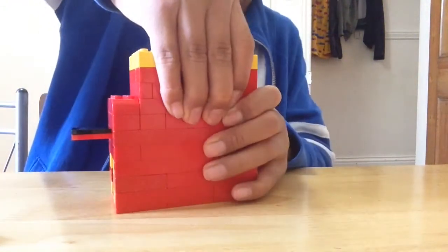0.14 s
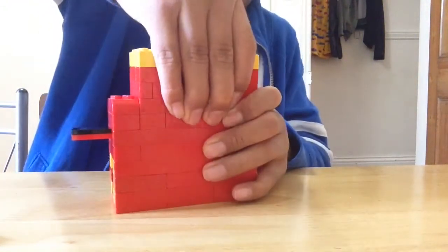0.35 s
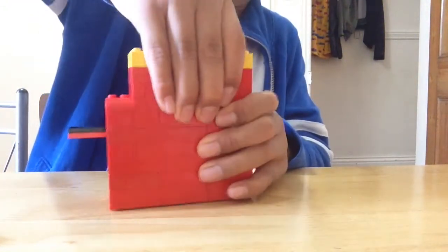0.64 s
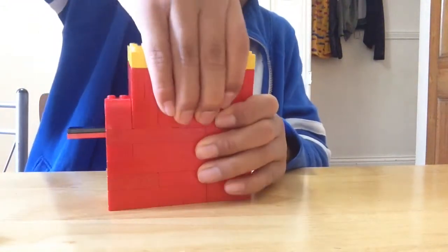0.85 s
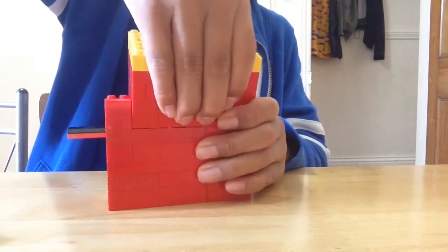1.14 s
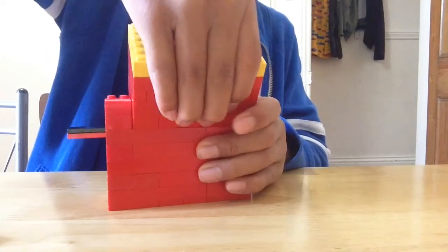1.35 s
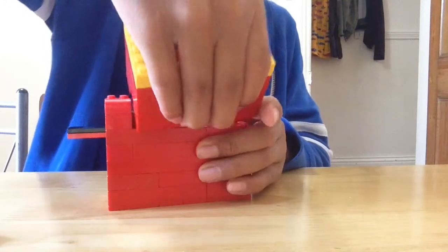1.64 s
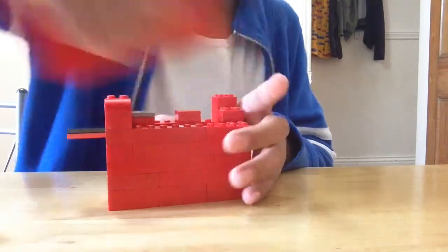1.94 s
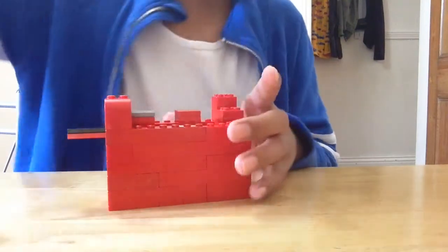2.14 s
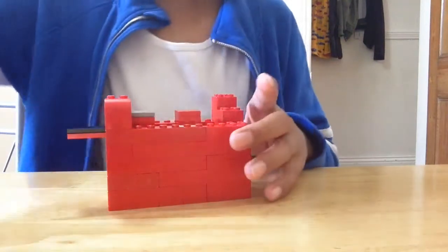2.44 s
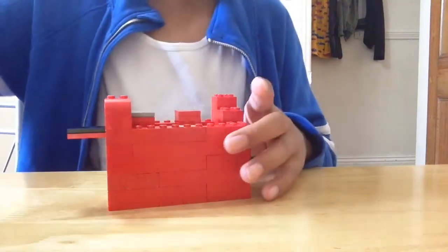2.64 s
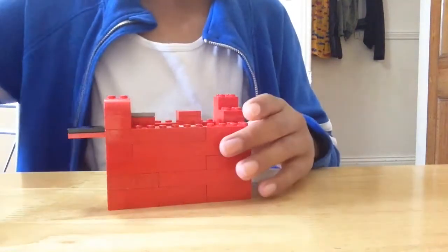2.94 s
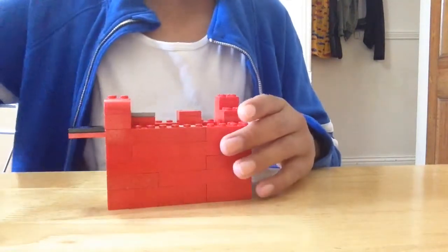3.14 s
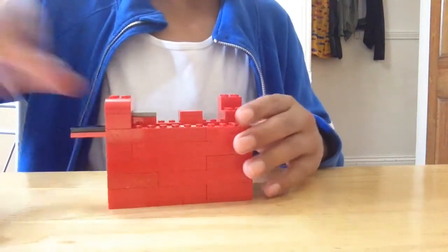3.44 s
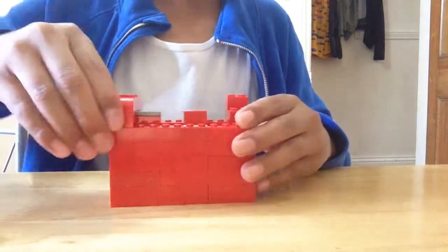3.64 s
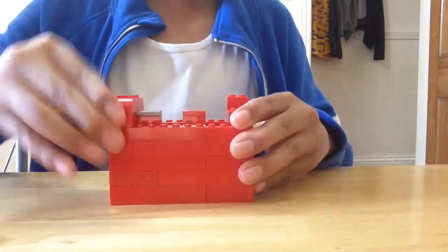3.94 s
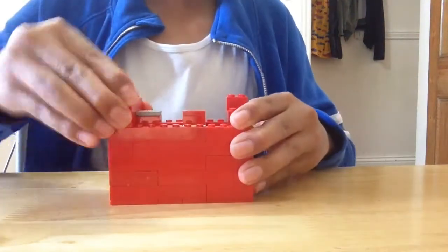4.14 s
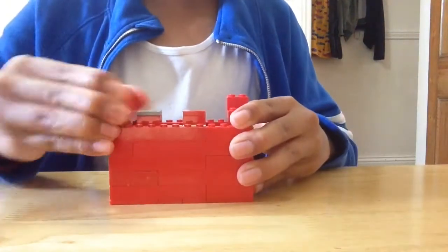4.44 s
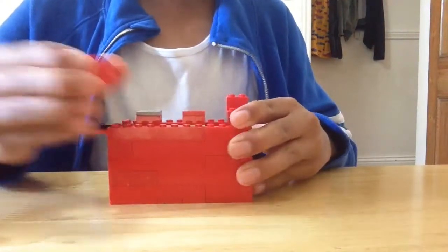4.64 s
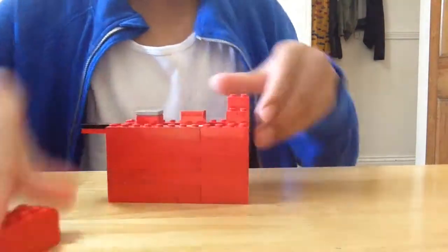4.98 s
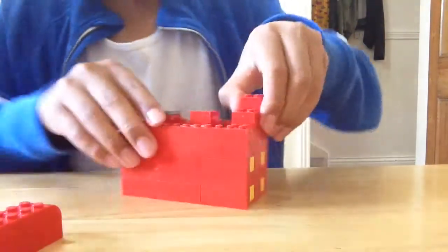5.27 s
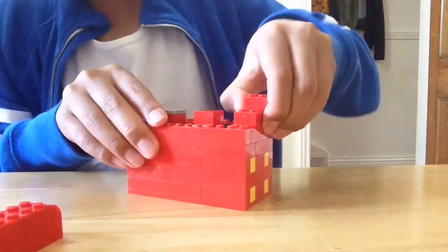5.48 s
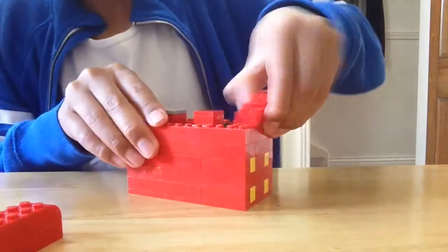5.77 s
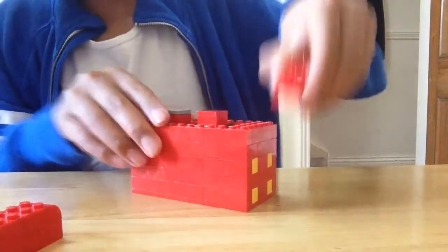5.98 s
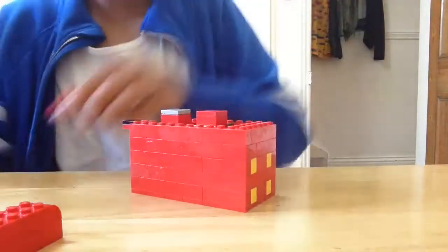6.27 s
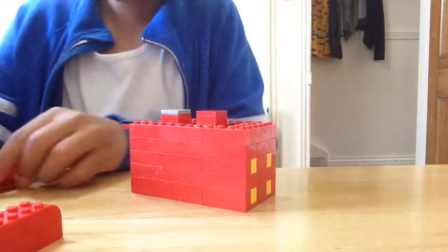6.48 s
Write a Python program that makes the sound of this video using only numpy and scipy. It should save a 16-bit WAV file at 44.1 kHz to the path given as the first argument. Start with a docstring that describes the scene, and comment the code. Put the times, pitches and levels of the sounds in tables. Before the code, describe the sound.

Hands pull plastic building bricks apart: dry clicks, short scrapes, a loose rattle, then two sharp cracks and last clicks over faint hiss.

```python
"""Hollow plastic toy bricks on a wooden table, close to a small microphone, for about six and a half seconds.
From the start there is hiss and the brush of hands; bricks click (chatter rings their thin walls), contacts thump
the table top, slipping bricks scrape and, from about 1 s, knocked or rubbed walls ring on in narrow bands of noise.
A small furnished room echoes it all. From 1.5 to 2.7 s it is sparse, then busy again; loose bricks rattle between
3.2 and 3.8 s. The loudest cracks come near 4.9 and 5.8 s, and a few last clicks near 6.5 s."""
import sys
import numpy as np
from scipy import signal
from scipy.fft import rfft, irfft, next_fast_len
from scipy.io import wavfile

SR = 44100
rng = np.random.default_rng(int(sys.argv[2]) if len(sys.argv) > 2 else 0)


def digitize_waveform(pressure):
    """Quantize a signal to 16-bit integers and store it at the path in sys.argv[1].

    Rows of a 2-D input are taken as channels; values are limited to [-1, 1].
    """
    field = np.atleast_2d(pressure).T
    bounded = np.clip(field, -1, 1)
    quanta = np.round(bounded * 32767).astype(np.int16)
    wavfile.write(sys.argv[1], SR, quanta)


def volts(x):
    """Linear amplitude factor 10**(x/20) for a level x in dB, scalar or array-like."""
    e = np.asarray(x, float) / 20
    return 10 ** e


N = 291492  # length in samples
T = np.arange(N) / SR  # time in seconds
HELD = .55  # share of the free ring time left while surfaces stay pressed together


def level(x, db):
    """Scale to an rms level in dB."""
    return x * volts(db) / np.sqrt(np.mean(x ** 2))


def band(x, lo_hz, hi_hz):
    """Keep the sound between two frequencies."""
    sos = signal.butter(2, [lo_hz, min(hi_hz, .45 * SR)], "band", fs=SR, output="sos")
    return signal.sosfilt(sos, x)


def fade_60db(t, t60):
    """A steady decay that has lost 60 dB after t60 seconds."""
    return np.exp(-np.log(1000) * t / t60)


def ring(hz, db, t60, size, sign=1):
    """One blow sets off several modes (natural tones of an object), and each dies away at its own speed."""
    t = np.arange(size)[:, None] / SR
    tones = np.sin(2 * np.pi * hz * t) * fade_60db(t, np.maximum(t60, .002))
    return (sign * volts(db) * tones).sum(axis=1)


def add(out, s, x, peak_db):
    """Lay a short sound in at time s with the given peak."""
    i = max(int(s * SR), 0)
    out[i:i + len(x)] += (x * volts(peak_db) / np.abs(x).max())[:N - i]


def grit(size, spread_db):
    """Dense tiny impacts: a few are much larger than the rest."""
    return rng.standard_normal(size) * volts(spread_db * rng.exponential(size=size))


# The tones of one brick's walls.
# Each row: frequency in Hz, level in dB, free ring time in seconds (to fall 60 dB).
BRICK_MODES = [(776, 6, 0.0077), (950, 0.5, 0.021), (1393, 5.5, 0.0089), (1503, 7, 0.008),
               (2200, 2, 0.0048), (2430, -1.5, 0.0061), (2770, 8, 0.0019), (3420, 6.5, 0.0044),
               (4027, 9, 0.0015), (4350, 7.5, 0.0027), (5460, -3, 0.0088), (5570, -1, 0.0053),
               (6380, 1.5, 0.0055), (7470, 3.5, 0.0017), (9500, 4, 0.0017), (11000, 4, 0.0017),
               (12580, -3, 0.0047), (14800, -2.5, 0.0041)]


def brick(force, ring_hz, below_db, above_db, free=1):
    """A force rings the walls; the grip shifts the modes a little and lets one region speak while it damps the rest."""
    hz, db, t60 = np.transpose(BRICK_MODES)
    grip_hz, grip_db = rng.standard_normal((2, len(hz)))
    # neighbouring modes move the air in opposite phase
    sign = (-1.) ** np.arange(len(hz))
    walls = ring(hz * (1 + 0.058 * grip_hz), db + 2 * grip_db, free * t60, size=1024, sign=sign)
    walls[0] = 2.67  # the bare crack of contact fills the gaps between the modes

    size = next_fast_len(len(force) + 1024, True)
    f = np.fft.rfftfreq(size, 1 / SR) + 1
    # both tilts are 0 at ring_hz; below grows toward the bass, above reaches 1 at 10 kHz
    below = np.clip(np.log(ring_hz / f) / max(np.log(ring_hz / 450), .4), 0, 1.5) ** 0.79
    most_above = 1.5 if above_db < 0 else 1
    above = np.clip(np.log(f / ring_hz) / np.log(10000 / ring_hz), 0, most_above) ** 0.98
    tilt = volts(below_db * below + above_db * above)
    sound = irfft(rfft(force, size) * rfft(walls, size) * tilt, size)
    return np.roll(sound, shift=44)  # 1 ms later


def bass(s, ring_hz, contact_db):
    """The smaller the wall that rings, the less bass under it: tilt in dB toward the bass."""
    # loose bricks stirred off to the side do not drive the table
    away_db = -12.5 * (3.3 < s < 3.76)
    return contact_db - 3 * np.log2(ring_hz / 450) + away_db  # 3 dB less per octave


def rub(envelope, spread_db, ring_hz, below_db, above_db, count):
    """Several bricks rub at once, each gripped its own way."""
    total = 0
    for _ in range(count):
        force = grit(len(envelope), spread_db) * envelope
        total = total + brick(force, ring_hz, below_db, above_db, free=HELD)
    return total


# The tones of the wooden table top.
# Each row: frequency in Hz, level in dB, ring time in seconds (to fall 60 dB).
TABLE_MODES = [(116, -9.5, 0.069), (194, -16, 0.079), (251, 0.5, 0.034), (304.7, 4, 0.057),
               (372.3, 0.5, 0.073), (454.4, 3, 0.043), (562, -6.5, 0.063), (667, -7, 0.046),
               (810, -23, 0.028)]


def table_top(hz_shift=0, db_shift=0):
    """One blow rings the wooden top; the shifts move each tone by a share of its frequency and by dB."""
    hz, db, t60 = np.transpose(TABLE_MODES)
    return ring(hz * (1 + hz_shift), db + db_shift, t60, size=6000)


# The colour of the hiss, from bass to treble.
# Each row: frequency in Hz, relative level in dB (the loudness is set in hiss()).
HISS_COLOUR = [(82, -43), (140, 0), (192, -32), (375, 25.5), (1090, 1), (1490, -13.5), (7780, -23),
               (12700, -34), (14600, -10), (15500, 4.5)]


def hiss():
    """Steady room tone and microphone noise: random noise shaped by frequency."""
    f = np.fft.rfftfreq(N, 1 / SR) + 1
    hz, db = np.transpose(HISS_COLOUR)
    colour_db = np.interp(np.log(f), np.log(hz), db)
    noise = irfft(rfft(rng.standard_normal(N)) * volts(colour_db), N)
    return level(noise, -70.5)


# How busily the hands move over the bricks; the level glides from row to row.
# Each row: time in seconds, level of the rubbed walls in dB.
HAND_MOTION = [(0.0, -55), (0.2, -67), (0.45, -68), (0.98, -62.5), (1.31, -66), (1.6, -67), (2.74, -67.5),
               (2.87, -50), (3.04, -60), (3.28, -60.5), (3.61, -55.5), (3.9, -65.5), (4.25, -65),
               (5.01, -64.5), (5.36, -63.5), (5.67, -67), (6.35, -67), (6.55, -64)]


def slide():
    """Slow light handling: hands brush the bricks and rest on the table, so walls, fine grit and table all sound."""
    busy_db = np.interp(T, *np.transpose(HAND_MOTION))
    rubbed = rub(np.ones(N), 1.95, 1100, 2.5, 0, count=5)[:N]
    walls = level(band(rubbed, 580, 5800), 0)
    fine = level(band(grit(N, 1.3), 2040, 14000), -1.5)  # dB against the walls
    table = level(signal.fftconvolve(rng.standard_normal(N), table_top())[:N], 0)
    # -65 dB at average busyness; the rumble follows 0.87 of the hands' rise and fall in dB
    rumble_db = -65 + 0.87 * (busy_db - busy_db.mean())
    return volts(busy_db) * (walls + fine) + volts(rumble_db) * table


# How long the room echoes.
# Each row: frequency in Hz, time in seconds for the echo to fall 60 dB.
ROOM_DECAY = [(150, 0.45), (500, 0.3), (1500, 0.23), (5000, 0.33), (14000, 0.22)]


def room(x):
    """Diffuse echoes, octave by octave, that start after the first walls."""
    t = np.arange(SR // 2) / SR
    decay_hz, decay_s = np.transpose(ROOM_DECAY)
    tail = 0
    for hz in 125 * 2 ** np.arange(7.):
        t60 = np.interp(np.log(hz), np.log(decay_hz), decay_s)
        tail = tail + band(rng.standard_normal(len(t)), hz, 2 * hz) * fade_60db(t, t60)
    tail = tail * np.clip((t - .004) / 0.0073, 0, 1)  # silent for 4 ms, then builds up
    tail = tail / np.sqrt(np.sum(tail ** 2))
    return volts(-10) * signal.fftconvolve(x, tail)[:N]


# Bricks that click apart or together.
# Each row: time in seconds, peak level in dB, loudest ring in Hz, treble tilt above that ring in dB.
BRICK_CLICKS = [(0.0064, -26.5, 3720, -2), (0.0881, -14.5, 760, 7.5), (0.198, -32, 2500, 1),
                (0.2177, -18.5, 1770, -3), (0.2323, -21.5, 961, 11), (0.255, -18.5, 920, 7),
                (0.266, -20.5, 2130, 20), (0.298, -19.5, 2300, -32), (0.3193, -22, 1710, 9),
                (0.455, -41.5, 940, -47), (0.6896, -24.5, 720, -24), (0.7044, -29, 740, -27),
                (0.7938, -24.5, 1780, -1), (0.824, -32.5, 2990, -10), (0.9267, -26, 2040, 1),
                (0.9435, -24.5, 2320, -3), (1.047, -20.5, 2190, -0.5), (1.0522, -22.5, 2300, -32),
                (1.151, -42, 2340, -16), (1.1864, -42, 1370, -17), (1.298, -40, 1600, -23),
                (1.402, -31, 1430, -11), (1.9078, -34, 1590, -5), (2.2344, -47.5, 1170, -32),
                (2.347, -47.5, 1540, -14), (2.707, -32.5, 1360, 33), (2.7305, -29.5, 1350, -1),
                (2.7654, -13.5, 2200, -5.5), (2.7817, -17, 925, -22), (2.9135, -24.5, 880, -10),
                (2.9393, -22, 980, -49), (2.977, -34, 1330, -4), (2.9959, -26.5, 1330, -12),
                (3.0034, -26, 1030, 0), (3.028, -26, 950, -18), (3.223, -33, 3230, -13),
                (3.24, -25.5, 2900, -40), (3.2754, -22.5, 896, -7.5), (3.3343, -16, 2130, -1),
                (3.3517, -18, 900, -13), (3.3723, -22.5, 3160, -16), (3.3857, -22, 3250, -22),
                (3.4007, -22.5, 2360, -25), (3.4107, -24.5, 1210, -24), (3.464, -33.5, 930, -4),
                (3.4874, -33, 2800, -16), (3.5546, -18.5, 3420, 6), (3.7351, -33.5, 872, -13),
                (3.8104, -32, 2900, -32), (3.9818, -29, 600, -26), (4.128, -41.5, 654, 2),
                (4.155, -35, 840, -28), (4.1856, -30.5, 1720, -14.5), (4.2205, -29.5, 2000, -9),
                (4.294, -22, 2240, -6.5), (4.4389, -18.5, 1620, -5.5), (4.4514, -23, 820, -7),
                (4.4744, -43, 1660, 4), (4.564, -34.5, 1030, -23), (4.5794, -39, 1310, 29),
                (4.8851, -11.5, 1300, -5.5), (4.901, -5, 4330, -12.5), (4.9135, -25, 2730, -32),
                (4.979, -19, 2620, -17.5), (5.0036, -19, 5600, -28), (5.0133, -18, 2370, -13),
                (5.0292, -23, 1380, -15), (5.244, -41, 1590, -43), (5.515, -28, 3100, -5),
                (5.5407, -21, 2780, 3.5), (5.6034, -22, 625, 0), (5.7962, -17, 6850, 3),
                (5.8006, -6.5, 3330, -8.5), (5.8124, -18.5, 751, -27), (5.848, -25.5, 2700, -12),
                (6.002, -41.5, 1490, -33), (6.0214, -40.5, 800, -14), (6.3133, -34.5, 937, -31),
                (6.383, -34, 700, -12), (6.4677, -14.5, 4200, -13), (6.4784, -27, 4030, -29),
                (6.5176, -29, 1500, -20), (6.566, -37, 1600, -18)]


def clicks():
    """Studs let go or meet in a quick chatter that rings the brick walls."""
    out = np.zeros(N)
    ms = np.arange(1024) / SR * 1000
    usual_ms, scatter, snap_db = 3.2, 0.11, 11.5  # chatter fade time, its scatter, size of the snap
    for s, peak_db, ring_hz, above_db in BRICK_CLICKS:
        chatter_ms = usual_ms * np.exp(scatter * rng.standard_normal())
        swell = 1 - np.exp(-ms / 2.03)
        chatter = grit(1024, 1.41) * swell * np.exp(-ms / chatter_ms)
        chatter[SR // 1000] = volts(snap_db)  # the first stud to go stands out, 1 ms in
        below_db = bass(s, ring_hz, -5.5)
        add(out, s - .002, brick(chatter, ring_hz, below_db, above_db, free=HELD), peak_db)
    return out


# Contacts heavy enough to sound the table.
# Each row: time in seconds, peak level in dB.
TABLE_THUMPS = [(0.084, -28.5), (0.216, -29), (0.252, -27), (0.3, -29.5), (0.448, -46.5), (0.69, -20),
                (0.925, -42.5), (1.047, -25), (1.083, -40.5), (1.216, -40.5), (1.319, -36.5),
                (1.384, -38.5), (1.492, -43.5), (1.913, -32), (2.346, -47.5), (2.766, -12.5), (2.782, -21),
                (2.934, -26.5), (3.016, -28.5), (3.237, -36), (3.29, -32), (3.541, -31), (3.83, -36),
                (3.98, -26), (4.106, -36.5), (4.197, -38), (4.452, -31), (4.491, -33.5), (4.885, -31),
                (4.976, -30.5), (5.011, -30.5), (5.148, -33), (5.603, -31.5), (5.8, -20), (5.826, -23),
                (6.02, -30.5), (6.311, -31.5), (6.349, -30), (6.382, -32.5), (6.462, -39.5), (6.563, -43)]


def thumps():
    """A push as long as the contact rings the table, then the edge settles; softer contact omits upper modes."""
    out = np.zeros(N)
    ms = np.arange(1024) / SR * 1000
    for s, peak_db in TABLE_THUMPS:
        # where it lands, and what rests on the table, sets the mix
        spot_hz, spot_db = rng.standard_normal((2, len(TABLE_MODES)))
        settle = volts(-17.0) * rng.standard_normal(len(ms)) * np.exp(-ms / 8)
        settle[0] = 1
        contact_ms = 0.49 - .01 * (peak_db + 22)  # 0.49 ms at -22 dB; harder landings are shorter
        push = np.exp(-.5 * ((ms[:300] - 3) / max(contact_ms / 3, .05)) ** 2)
        wood = table_top(0.031 * spot_hz, 1.6 * spot_db)
        add(out, s - .004, signal.fftconvolve(np.convolve(push, settle), wood), peak_db)
    return out


# Scrapes that start as a brick slips free.
# Each row: start in seconds, peak level in dB, loudest ring in Hz, treble tilt above that ring in dB,
# fade time in seconds.
BRICK_SCRAPES = [(0.21, -23.5, 630, 0.5, 0.082), (0.2603, -29.5, 960, 1.5, 0.034),
                 (0.293, -41.5, 2360, -7, 0.12), (0.797, -42, 1760, -8, 0.037),
                 (0.924, -31, 2030, -6, 0.028), (0.969, -39.5, 1920, -5, 0.095),
                 (1.145, -39.5, 2180, -19, 0.063), (1.4056, -30, 2020, -6, 0.083),
                 (1.833, -47, 1060, -16, 0.12), (2.349, -50.5, 1520, 7, 0.058),
                 (2.704, -37, 1320, -3, 0.14), (2.731, -26.5, 1340, 8, 0.096),
                 (2.793, -30.5, 1020, -1, 0.05), (2.899, -35, 1310, -7.5, 0.056),
                 (3.044, -36.5, 3200, -9, 0.53), (3.223, -30.5, 2860, -11, 0.14),
                 (3.274, -27, 2160, -30, 0.12), (3.324, -29.5, 1200, -17, 0.11),
                 (3.39, -26, 3140, -23, 0.051), (3.476, -32, 940, -10, 0.028),
                 (3.53, -31.5, 2200, -15, 0.028), (3.5446, -22.5, 3430, -14, 0.087),
                 (3.595, -33, 1270, -25, 0.033), (3.644, -42, 3300, -33, 0.12),
                 (3.743, -35, 850, -10, 0.032), (3.823, -43, 856, -13, 0.15),
                 (4.452, -27.5, 810, -22, 0.036), (4.552, -40, 1070, -23, 0.034),
                 (4.7365, -37, 370, -61, 0.11), (4.902, -34, 2780, -22, 0.073),
                 (4.972, -26.5, 2760, -28, 0.058), (5.004, -29, 2300, -25, 0.041),
                 (5.155, -42, 417, -43, 0.13), (5.35, -52, 616, -26, 0.13), (5.806, -31, 751, -40, 0.083),
                 (5.8483, -35, 2870, -19, 0.099), (6.021, -32, 500, -40, 0.013),
                 (6.301, -35.5, 670, -22.5, 0.067), (6.369, -43.5, 600, -15, 0.081),
                 (6.513, -38, 1200, -15, 0.034)]


def scrapes():
    """Each slip starts at once, catches unevenly on the studs and slows down."""
    out = np.zeros(N)
    t = np.arange(11 * 1024) / SR  # the slip lasts a quarter of a second at most
    for s, peak_db, ring_hz, above_db, length in BRICK_SCRAPES:
        catch_db = 2.32 * np.repeat(rng.standard_normal(88), 128)  # a new hold about every 3 ms
        slip = np.clip(t / 0.003, 0, 1) * np.exp(-(t / max(length, .01)) ** 1.51)
        below_db = bass(s, ring_hz, -5)
        add(out, s, rub(volts(catch_db) * slip, 2.66, ring_hz, below_db, above_db, count=3), peak_db)
    return out


# One wall rings on in a narrow band, after a knock or while it is rubbed.
# Each row: start in seconds, fade time in seconds, pitch in Hz, band width in Hz, starting level in dB.
WALL_RINGS = [(0.96, 0.05, 11000, 350, -49), (1.148, 0.086, 6750, 300, -61),
              (2.705, 0.081, 10600, 450, -46), (2.797, 0.087, 10700, 400, -45),
              (3.549, 0.095, 6830, 400, -42), (3.552, 0.031, 9660, 350, -38.5),
              (5.805, 0.072, 6720, 400, -50), (6.4669, 0.0035, 4110, 1070, -15.5),
              (4.438, 0.0043, 1650, 494, -21), (1.4, 0.032, 1430, 600, -42),
              (6.466, 0.099, 4130, 890, -45.5)]


def wall_rings():
    """A wavering ring, made of narrow noise, that starts at once and fades, briefly after a knock, longer after a rub."""
    out = np.zeros(N)
    for s, length, hz, width_hz, db in WALL_RINGS:
        edges = hz - width_hz / 2, hz + width_hz / 2
        fade = (T > s) * np.exp(-np.clip((T - s) / length, 0, 5) ** 1.2)
        narrow = band(band(rng.standard_normal(N), *edges), *edges)
        out += fade * level(narrow, db)
    return out


# When loose bricks tumble against each other.
# Each row: start in seconds, end in seconds.
RATTLE_TIMES = [(3.22, 3.43), (3.53, 3.76)]


def rattle():
    """Loose bricks stirred by a hand: many small clicks of many pitches, weaker toward the end."""
    out = np.zeros(N)
    ms = np.arange(512) / SR * 1000
    for start, end in RATTLE_TIMES:
        count = int(140 * (end - start))  # 140 clicks per second
        for when, pitch, size in rng.random((100, 3))[:count]:
            force = grit(512, 1.2) * np.exp(-ms / 1.7)
            tick = brick(force, 900 * 2 ** (2.3 * pitch), -15, -9)
            add(out, start + when * (end - start), tick, -37.5 + 9 * size - 6 * when)
    return out


def scene():
    """Hands, bricks and table in the room."""
    near = slide() + clicks() + thumps() + scrapes() + wall_rings() + rattle()
    return (near + room(near) + hiss())[None]


def low_pass(x):
    """Removes everything above the highest recorded frequency."""
    return signal.sosfilt(signal.butter(12, 16470, fs=SR, output="sos"), x)


def record(dry):
    """The small microphone drops the deep bass steeply, down to a faint rest, and the very top."""
    no_bass = signal.sosfilt(signal.butter(7, 150, "high", fs=SR, output="sos"), dry)
    x = no_bass + volts(-23) * dry
    x = signal.sosfilt(signal.ellip(8, .2, 45, 15400, fs=SR, output="sos"), x)
    return low_pass(x)


dry = scene()
out = record(dry)
digitize_waveform(out)
```